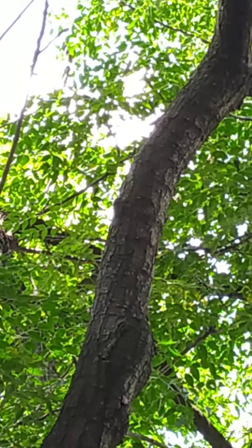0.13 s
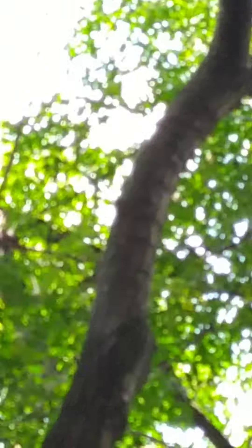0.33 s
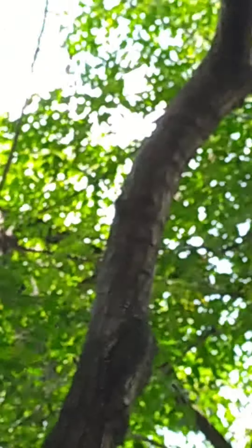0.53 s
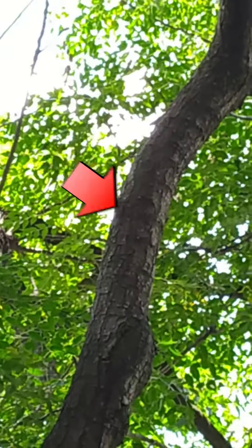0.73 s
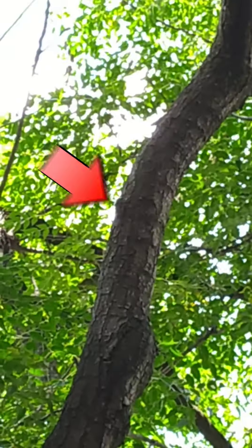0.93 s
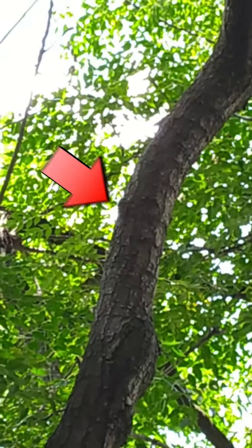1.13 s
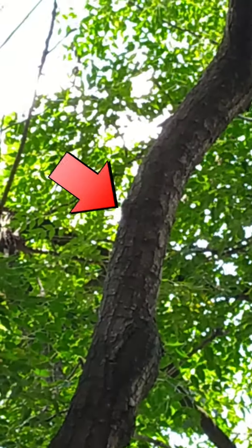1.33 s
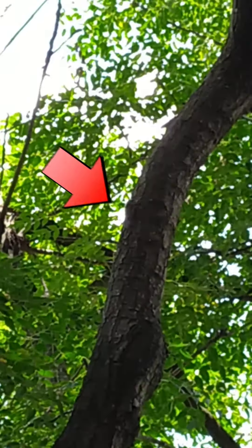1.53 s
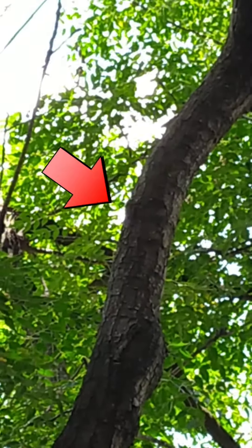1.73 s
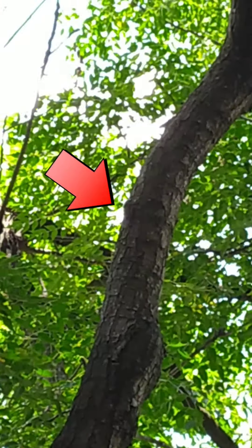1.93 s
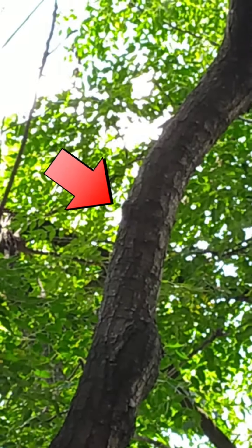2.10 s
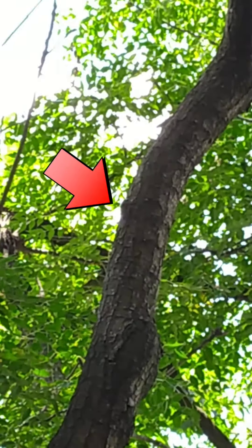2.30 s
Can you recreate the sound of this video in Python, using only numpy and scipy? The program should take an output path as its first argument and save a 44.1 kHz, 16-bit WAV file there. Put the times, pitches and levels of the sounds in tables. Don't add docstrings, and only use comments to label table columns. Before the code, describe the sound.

Outdoors under leaves, a nearby cicada repeats short, swelling, rasping buzzes at an even quick pace throughout, each with a brief leafy echo; a low hum, soft traffic rumble and far cicadas stay very quiet underneath.

```python
import sys
import numpy as np
from scipy import signal
from scipy.fft import rfft, irfft
from scipy.io import wavfile
from scipy.ndimage import uniform_filter1d

SR = 44100
rng = np.random.default_rng(int(sys.argv[2]) if len(sys.argv) > 2 else 0)


def generate_wav(sig):
    pcm = np.round(np.clip(np.atleast_2d(sig).T, -1, 1) * 32767).astype(np.int16)
    wavfile.write(sys.argv[1], SR, pcm)


def volts_from_db(level):
    exponent = np.asarray(level, float) / 20
    return 10 ** exponent


N = 108486
LEAD_IN = 22050
CONTROL = 32


def evened(x):
    return x / np.sqrt(np.mean(x ** 2) + 1e-20)


def read(points, hz):
    f, value = np.transpose(points)
    return np.interp(np.log(hz + 1), np.log(f + 1), value)


def smoothed(x, along_hz, along_time):
    return uniform_filter1d(uniform_filter1d(x, size=along_hz, axis=0), size=along_time, axis=1)


def wander(per_s, size):
    r = np.exp(-2 * np.pi * per_s / SR)
    drift = signal.lfilter([1], [1, -2 * r, r * r], rng.standard_normal(size + SR))
    return evened(drift[SR:])


def resonate(x, hz, width_hz):
    turn = np.exp(2j * np.pi * np.cumsum(hz * np.ones(len(x))) / SR)
    r = np.exp(-np.pi * abs(width_hz) / SR)
    smooth = signal.lfilter([(1 - r) ** 2], [1, -2 * r, r * r], x / turn)
    return 2 * (turn * smooth).real


def since(lead_s, rise_s):
    # start_s, length_s, effort_db
    throbs = [(0.023, 0.078, -30.5), (0.255, 0.084, -30), (0.491, 0.082, -29.5), (0.721, 0.082, -29.5),
              (0.956, 0.072, -30), (1.187, 0.086, -30), (1.417, 0.074, -30), (1.65, 0.07, -30),
              (1.882, 0.08, -30.5), (2.111, 0.072, -31), (2.335, 0.072, -31)]
    starts, _, effort_db = np.transpose(throbs)
    starts = np.append(starts[0] - 0.19, starts)
    effort_db = np.append(effort_db[0], effort_db)
    now = np.arange(-LEAD_IN, N, CONTROL) / SR
    return now - starts[:, None] + lead_s + rise_s / 2, effort_db[:, None]


def effort(lead_s, rise_s, hold_s):
    fast_db_per_s, slow_db_per_s, slow_db = 357, 153, -15.5
    t, effort_db = since(lead_s, rise_s)
    after = np.maximum(t - rise_s - hold_s, 0)
    drop = volts_from_db(-fast_db_per_s * after) * (1 - volts_from_db(slow_db))
    trail = volts_from_db(slow_db - slow_db_per_s * after)
    swell = np.sin(np.pi / 2 * np.clip(t / rise_s, 0, 1)) ** 2
    shape = swell * (drop + trail) * volts_from_db(effort_db)
    return np.repeat(shape.sum(0), CONTROL)[:LEAD_IN + N]


def abdomen(drive):
    lead_s, rise_s, hold_s = .031, .01, .05
    shut_hz, open_hz, opening_s = 2200, 2860, .06
    t = since(lead_s, rise_s)[0]
    age = np.where(t > 0, t, 9).min(0)
    age = np.repeat(age, CONTROL)[:len(drive)]
    hz = shut_hz + (open_hz - shut_hz) * np.clip(age / opening_s, 0, 1)
    ring = volts_from_db(-14.5) * evened(resonate(drive, hz, 260))
    low_ring = volts_from_db(-22.5) * evened(resonate(drive, 2440, 430))
    return (ring + low_ring) * effort(lead_s, rise_s, hold_s)


def rib_clicks(size):
    clicks_per_s, jitter, size_db, rasp = 480, .35, 1, 0.52
    turns = np.cumsum(clicks_per_s * np.exp(jitter * wander(250, size))) / SR
    clicks = np.diff(np.floor(turns), prepend=0) * volts_from_db(size_db * rng.standard_normal(size))
    puffs = signal.lfilter([1], [1, -.98], clicks) * rng.standard_normal(size)
    return (1 - rasp) * evened(clicks) + rasp * evened(puffs)


def tymbal():
    # pitch_hz, width_hz, level_db, lead_s
    modes = [(2970, 72, -29, 0.0022), (3480, 400, -24, 0.022), (3922, 480, -20.5, .016),
             (4692, 890, -16, .012), (5310, 930, -16, 0.011), (6568, 1120, -6, 0.0025),
             (7953, 1170, -11.5, 0.0016), (9100, 1050, -1.5, 0.00074), (10275, 920, -1.5, 0.0018),
             (10960, 2200, -8, 0.0012), (12330, 270, -27, 0.0011)]
    drive = rib_clicks(LEAD_IN + N)
    bend = 1 + 0.0087 * wander(60, len(drive))
    song = abdomen(drive)
    for k, (hz, width_hz, db, lead_s) in enumerate(modes):
        ring = evened(resonate(drive, hz * bend, width_hz))
        song = song + (-1) ** k * volts_from_db(db) * effort(lead_s, rise_s=0.038, hold_s=0.013) * ring
    return volts_from_db(-4) * song


def cicada():
    a, b = tymbal(), tymbal()
    across = .4
    return np.array([a + across * b, b + across * a])


def scatter(t60_s, level_db):
    taps = np.zeros((2, LEAD_IN))
    at = np.arange(20, LEAD_IN - 20, 20) + rng.integers(0, 20, (2, (LEAD_IN - 21) // 20))
    np.put_along_axis(taps, at, rng.choice([-1., 1.], at.shape), 1)
    taps = taps * volts_from_db(-60 * np.arange(LEAD_IN) / SR / t60_s)
    return volts_from_db(level_db) * taps / np.linalg.norm(taps[0])


def leaves(x):
    bark = scatter(t60_s=.012, level_db=-9)
    foliage = scatter(t60_s=0.29, level_db=3)
    taps = bark + foliage
    taps[0, 16], taps[1, 0] = 1, 1
    return signal.fftconvolve(x, taps, axes=1)[:, LEAD_IN:LEAD_IN + N]


def fan():
    # multiple_of_speed, level_db
    orders = [(1, -64.5), (2, -62.5), (4, -50.5), (5, -59.5), (6, -64), (9, -57), (10, -60.5), (14, -67.5),
              (16, -63), (20, -65)]
    # pitch_hz, width_hz, level_db
    drones = [(36.9, 4.5, -56), (165.2, 24.5, -52.5), (231.5, 28, -57)]
    turns = np.cumsum(62.6 * (1 + 0.00049 * wander(3.7, N))) / SR
    hum = np.zeros(N)
    for multiple, db in orders:
        level = volts_from_db(db + 2.5 + 1.08 * wander(5.7, N))
        hum += level * np.sin(2 * np.pi * (round(multiple) * turns + rng.random()))
    for hz, width_hz, db in drones:
        hum += volts_from_db(db) * evened(resonate(rng.standard_normal(N), hz, width_hz))
    return np.array([hum, np.roll(hum, 4)])


def air(spectrum, level_db, patchy_db):
    # pitch_hz, likeness (0-1)
    likeness = [(30, .97), (80, 1.2), (160, 0.76), (300, 0.6), (600, .5), (1200, -0.24), (4000, 0.23)]
    frames, hz = N // 256 + 5, np.fft.rfftfreq(1024, 1 / SR)
    a, b, c, d, patches = rng.standard_normal((frames, 513, 5)).T
    patches = evened(smoothed(patches, 8, 12))
    same = np.clip(read(likeness, hz), 0, 1)[:, None]
    left = a + 1j * b
    right = same * left + np.sqrt(1 - same ** 2) * (c + 1j * d)
    z = np.array([left, right]) * volts_from_db(read(spectrum, hz)[:, None] + patchy_db * patches)
    noise = signal.istft(z, nperseg=1024, noverlap=768)[1][:, :N]
    return volts_from_db(level_db) * evened(noise)


def town():
    # pitch_hz, level_db per Hz
    rumble = [(12, -43), (20, -15), (86, -11), (245, -5), (353, -8.5), (572, -13), (667, -14),
              (1020, -13.5), (2000, -24.5), (2600, -60), (4400, -120)]
    return air(rumble + [(2600, -64)], -44, 0.69)


def far_chorus():
    # pitch_hz, level_db per Hz
    chorus = [(1060, -43), (1800, -2), (2620, -2), (3750, -4), (6600, -3), (7340, -5), (9150, -4),
              (10900, -3), (12700, -26), (16500, -54), (22000, -120)]
    return air([(1300, -70)] + chorus, -46.5, 3.9)


def hiss():
    # pitch_hz, level_db per Hz
    floor = [(11500, -30), (12800, -1), (15000, 0), (16000, -3), (17000, -60)]
    return air(floor, -78, 3.2)


def scene():
    return leaves(cicada()) + fan() + town() + far_chorus() + hiss()


def masked(x):
    lo_hz, hi_hz = 3050, 7800
    hz, _, z = signal.stft(x, SR, nperseg=2048, noverlap=1024)
    raw = (abs(z) ** 2).sum(0)
    bands, frames = raw.shape

    whim = evened(smoothed(rng.standard_normal((bands, frames)), 7, 3))
    power = smoothed(raw, 7, 2)
    weak = power < volts_from_db(2 * (-4.3 + 4.6 * whim)) * uniform_filter1d(power, size=30, axis=0)
    weak = weak & ((hz > lo_hz) & (hz < hi_hz))[:, None]

    treble = raw[hz > hi_hz].sum(0)
    treble = treble / np.percentile(treble, 90)
    blocks = rng.random((bands // 12 + 1, frames))
    thin = np.repeat(blocks, 12, axis=0)[:bands] > .45
    edge_hz = 12100 + 500 * np.minimum(treble, 1) ** .25
    loud_before = np.roll(treble, 1) > volts_from_db(2 * -14)
    top = (hz[:, None] > edge_hz) & (thin | loud_before)

    gain = np.where(weak, volts_from_db(-45), 1) * ~(top | (hz > 15100)[:, None])
    return signal.istft(z * gain, SR, nperseg=2048, noverlap=1024)[1][:, :N]


def roll_off(x):
    return signal.sosfilt(signal.butter(12, 15300, fs=SR, output="sos"), x)


def record(dry):
    # pitch_hz, level_db
    balance = [(60, 4.0), (130, 7), (270, 5.8), (590, 3.7), (1250, 5.8), (2680, 1.1), (5720, 0.33),
               (12200, 7.1)]
    tilt = volts_from_db(read(balance, np.fft.rfftfreq(N, 1 / SR)) / 2)
    ports = irfft(rfft(dry, axis=1) * np.array([tilt, 1 / tilt]), N, axis=1)
    return roll_off(masked(ports))


dry = scene()
out = record(dry)
generate_wav(out)
```